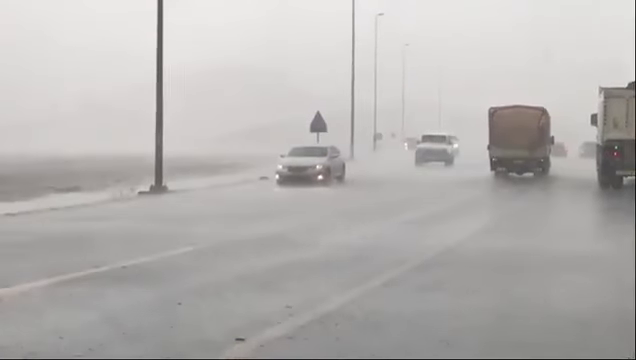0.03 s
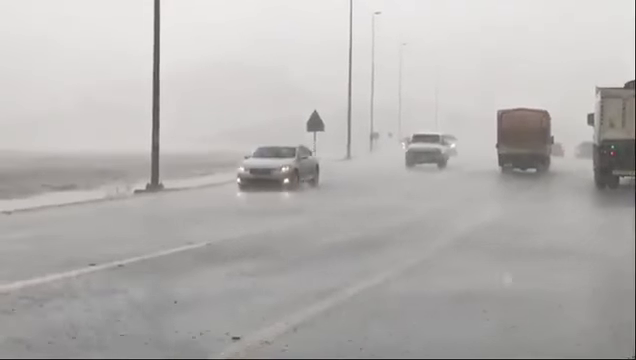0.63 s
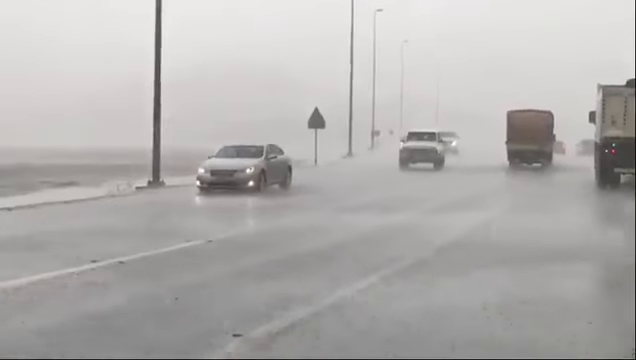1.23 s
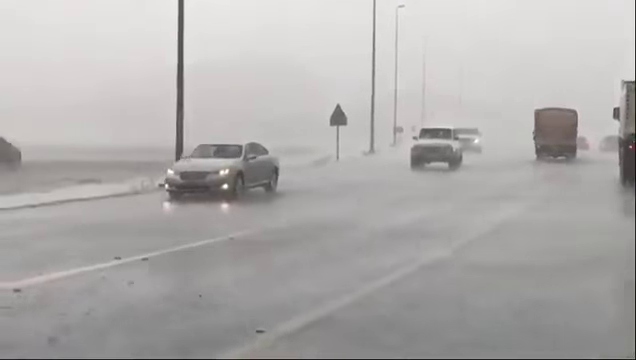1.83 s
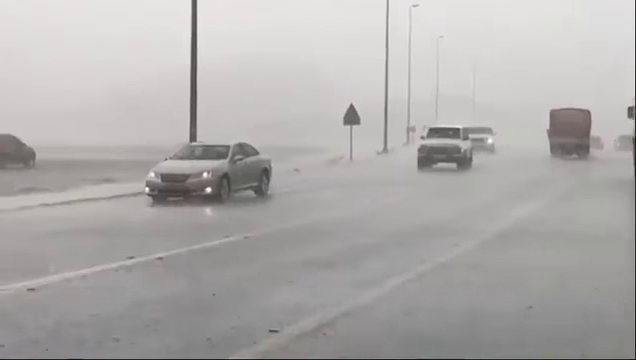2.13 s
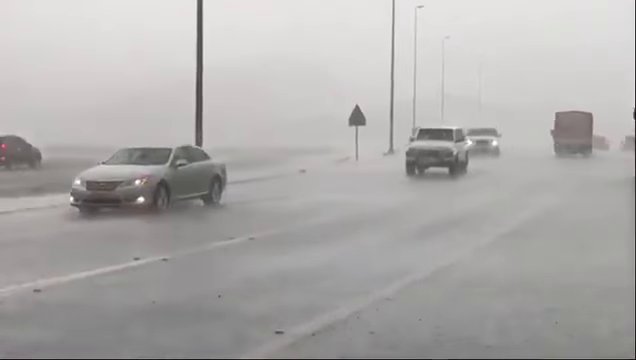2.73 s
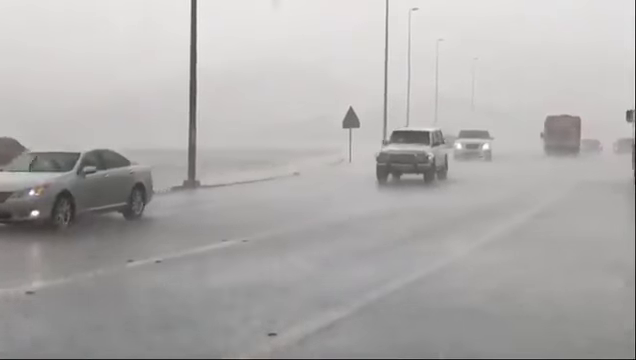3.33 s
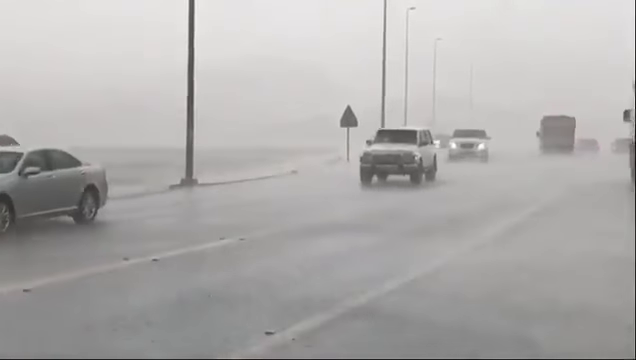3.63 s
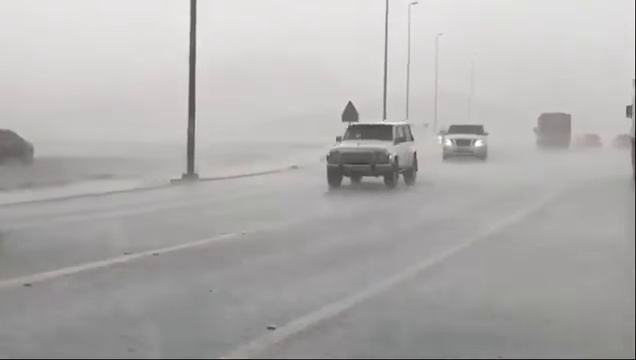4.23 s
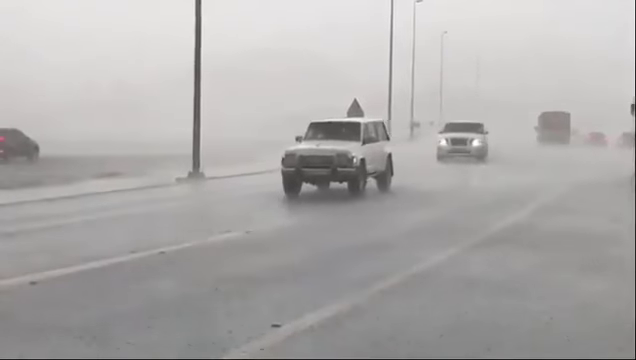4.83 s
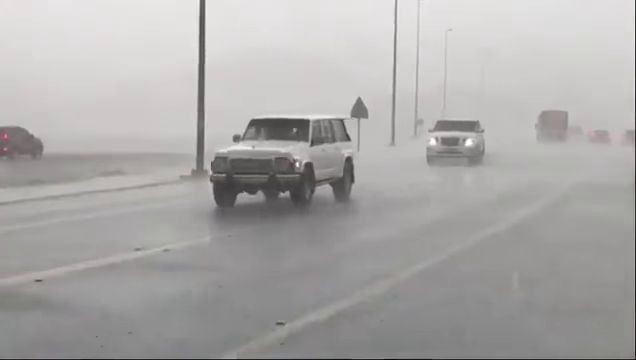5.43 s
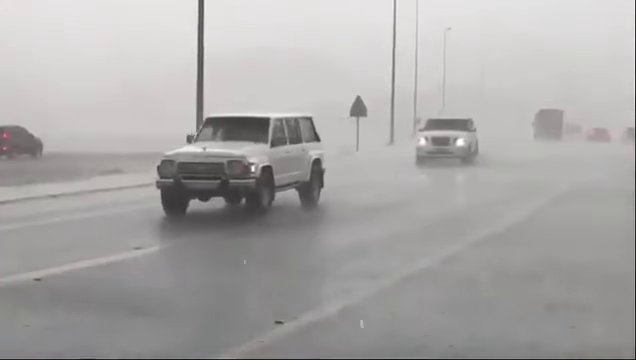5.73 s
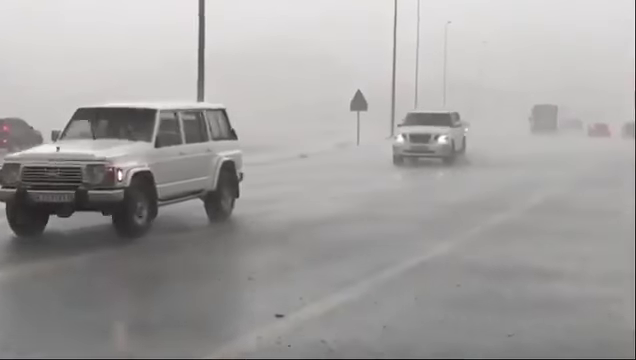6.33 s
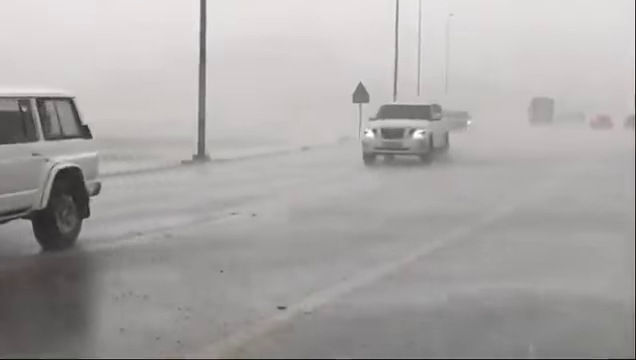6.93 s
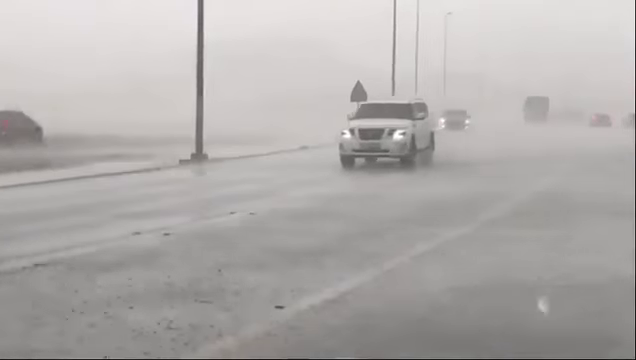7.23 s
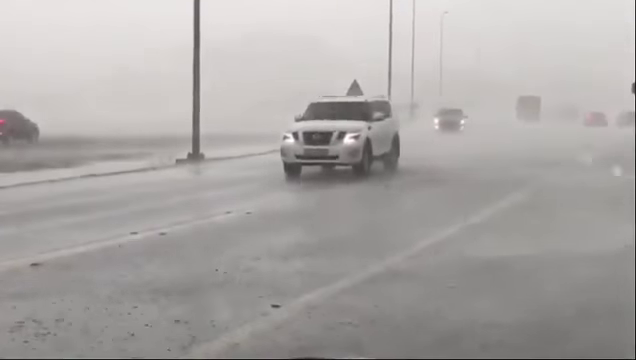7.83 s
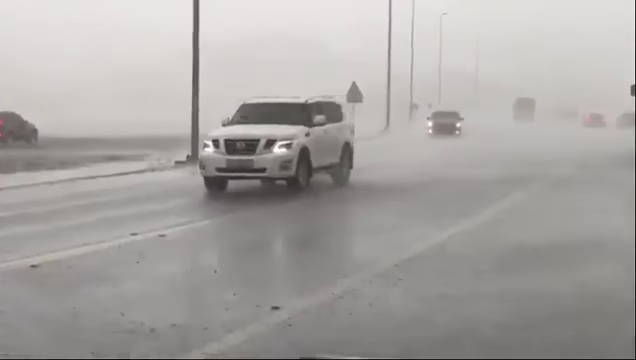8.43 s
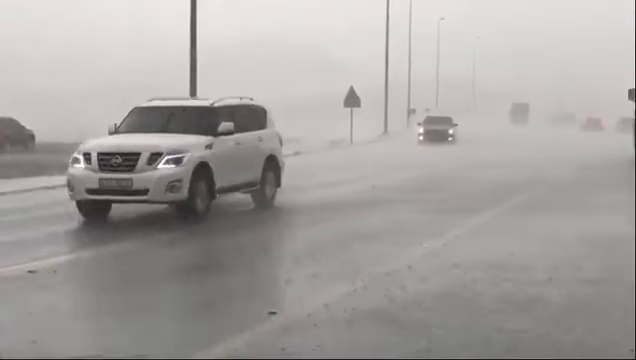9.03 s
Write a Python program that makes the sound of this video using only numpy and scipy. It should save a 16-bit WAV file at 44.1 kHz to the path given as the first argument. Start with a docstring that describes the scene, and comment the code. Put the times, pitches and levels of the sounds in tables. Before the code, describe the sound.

Heavy rain washes and patters on a flooded highway for the whole nine seconds, with water sloshing on the road and a faint rumble of distant traffic. Fat drops tick sharply close to the microphone at irregular moments, and gobs of water splash, mostly in the first five seconds. The rain swells briefly around 1, 2, 3 and 5 seconds. Two dull taps knock the microphone at about 0.4 and 3.6 seconds, and short, low wind puffs come and go, clearest near 2.5. Faint bubbles plink near 4.2 and 7.8 seconds. A car rolls slowly past at about 5.4 seconds, its tyres roaring and hissing with spray. A second, louder car builds behind it and peaks around 8 seconds. Its low engine hum comes in at about 6 seconds and rises slightly in pitch to the end.

```python
"""Downpour on a flooded highway

Heavy rain washes and patters. Fat drops tick on a surface close by, gobs of water splash and bubbles plink.
Two cars roll past slowly, tyres roaring and throwing up spray; the last one's engine hums and gains a
little speed. Now and then wind buffets the microphone, and two dull taps knock the phone's body."""
import sys
import numpy as np
from scipy import signal
from scipy.fft import rfft, irfft, next_fast_len
from scipy.io import wavfile
from scipy.ndimage import uniform_filter1d, map_coordinates

SR = 44100
rng = np.random.default_rng(int(sys.argv[2]) if len(sys.argv) > 2 else 0)


def persist_wave(psi):
    """Save psi, clipped to +-1, as 16-bit WAV."""
    counts = np.round(np.clip(psi, -1, 1) * 32767).astype(np.int16)
    wavfile.write(sys.argv[1], SR, np.atleast_2d(counts).T)


N = 399987

# Event levels are relative: each layer adds its own trim.
# the fattest close drops: time_s, level_db, pitch_hz, crack_db (against the tick)
CLOSE_DROPS = [(0.304, -10, 3700, -3), (0.7408, 0, 4160, -13), (0.816, -17, 3040, 4),
               (1.4682, -4, 2880, -22), (1.494, -12, 5300, -14), (1.5703, -10.5, 3870, -20),
               (1.645, -12, 4300, -17), (2.0134, -9, 3900, -20), (2.0506, -4, 4000, -22),
               (2.684, -9.5, 3600, 7), (3.101, -13.5, 4430, -14), (3.127, -7.5, 4270, -22),
               (3.1915, -5.5, 3140, -15), (3.4134, -5.5, 3720, -15), (4.2346, -8.5, 3640, -20),
               (4.783, 2.5, 5730, -9), (4.9601, -6.5, 3900, -18), (5.1964, -10, 3130, -5),
               (5.258, -9.5, 3990, 2), (5.9274, -10, 2420, -22), (6.8153, -7, 3500, -18),
               (7.0901, -3.5, 6900, -18), (7.111, -6.5, 3170, -18), (7.134, -5, 3360, -22),
               (7.2671, -5, 2840, -4), (7.4345, -4.5, 4040, -22), (8.1583, -4.5, 2939, -8)]
# the biggest splashes: start_s, level_db, pitch_hz, t60_s
BIG_SPLASHES = [(.13, -13.5, 1450, 0.25), (.276, -12.5, 3300, .17), (.728, -13, 4200, 0.069),
                (.742, -18.5, 1000, 0.36), (1.157, -10.5, 3950, 0.11), (1.66, -12.5, 1300, 0.12),
                (1.904, -3.5, 2200, 0.086), (2.185, -7, 3380, 0.078), (2.683, -7.5, 3160, 0.21),
                (3.192, -11, 3100, 0.11), (3.554, -16.5, 650, .15), (3.759, -12.5, 1100, 0.16),
                (4.03, -15.5, 900, 0.16), (4.481, -17, 1390, 0.37), (4.783, -13, 1500, 0.066),
                (4.856, -8, 4500, 0.043), (5.924, -3, 3550, 0.043), (7.639, -12.5, 900, 0.25),
                (8.157, -14, 2600, 0.16)]
# sheets of heavier rain: centre_s, level_db, half_width_s
RAIN_SHEETS = [(0.83, -1, 0.068), (2.05, 0, 0.25), (3.15, -1.5, 0.094), (3.88, -3, 0.078), (4.45, -8, 0.22),
               (5.2, -1, 0.11)]
# bubbles in a puddle: start_s, level_db, pitch_hz
PUDDLE_PLINKS = [(4.176, -17.5, 1770), (7.75, -19, 1710)]
# cars rolling past: nearest_s, tyres_db, rumble_db, distance_m
CAR_PASSES = [(5.35, -5.5, -36, 3.65), (8.0, 0, -41.5, 8.5)]
# the last car's engine: time_s, firing_hz, boom_db, overtones_db
ENGINE_CURVES = [(5.6, 45.33, -56, -58), (6.4, 45.93, -35.5, -46), (7.1, 48.47, -31.5, -46),
                 (7.3, 48.6, -42, -43.5), (8.1, 50.95, -40, -36.5), (9.07, 51.66, -41, -39.5)]
# exhaust overtones: firing_multiple, level_db
EXHAUST_OVERTONES = [(2, 1), (3, 0.5), (4, -2), (6, -4.5), (7, -8.5), (11, -14)]
# wind puffs on the microphone: centre_s, level_db, half_width_s
WIND_PUFFS = [(0.08, -32.5, 0.082), (.285, -28, 0.0059), (0.554, -30.5, 0.014), (1.426, -31, .023),
              (2.478, -22, 0.012), (2.518, -20, 0.014), (2.8, -35.5, 0.059), (7.169, -22.5, 0.0051),
              (7.457, -24, 0.0093), (8.39, -31, .05)]
# taps on the phone's body: start_s, level_db, pitch_hz
BODY_KNOCKS = [(0.37, -20.5, 314), (3.564, -22.5, 342)]

# EQ curves, all with the columns: frequency_hz, gain_db
WASH_EQ = [(90, -26), (160, 6.5), (220, -3.5), (480, -7.5), (700, -7), (1000, -7.5), (1400, -12),
           (4200, -7), (5500, -13), (7500, -9.5), (10400, -16.5)]  # far rain
PATTER_EQ = [(300, -12), (1000, -6.5), (2000, -5), (4200, 0.5), (5200, 1.5), (10400, -0.5)]  # small drops nearby
SLOSH_EQ = [(200, -15), (400, -4), (1000, 0.5), (1800, -5), (3500, -15), (9000, -37)]  # water running on the road
SPRAY_EQ = [(700, -27), (1600, -5), (2400, 0), (3300, -0.5), (4400, -2), (6500, -6), (10400, -14)]  # hiss of flying water
ROAR_EQ = [(90, -1), (160, -2), (280, 0.5), (430, -3), (560, -4), (750, -3.5), (1050, -0.5), (1600, -5.5),
           (3000, -32)]  # tyres on the road
RUMBLE_EQ = [(18, -25), (30, -22), (42, -2), (65, 0), (110, -3.5), (190, -8), (300, -13), (600, -25.5),
             (1500, -71)]  # the vehicles' low end
GROWL_EQ = [(110, -25), (160, 6), (220, -17), (350, -1), (450, -7), (550, 2.5), (620, 0), (760, -29)]  # the engine's body
BUFFET_EQ = [(18, -23), (40, -10), (75, 4), (130, -5), (250, -12.5), (500, -19.5), (1500, -52), (4000, -85)]  # wind on the microphone
MIC_PORT_EQ = [(3300, 0), (3650, -1), (4200, 0), (4850, -2.5), (5300, -0.5), (7000, 0.5), (7600, -2),
               (8600, 1)]  # the microphone port

TOP_HZ = 10500  # band limit


def rain():
    """Far drops merge into a wash; nearer ones patter in flurries, tap the surface and ring bubbles."""
    wash = amp(-36 + 0.24 * wobble(7)) * rush(WASH_EQ, patchy_db=5)
    fine = grains(count=14000, pitch_hz=3430, spread=0.762, cycles=2.6, accent_db=6.5, size=150)
    clicks = grains(count=400, pitch_hz=4520, spread=0.37, cycles=0.8, accent_db=6, size=100)
    pings = unit(grains(count=90, pitch_hz=4030, spread=0.11, cycles=2.6, accent_db=1, size=400))
    bubbles = grains(count=2500, pitch_hz=3570, spread=0.5, cycles=16, accent_db=0.5, size=700)
    fine, clicks, bubbles = (coloured(layer, PATTER_EQ) for layer in (fine, clicks, bubbles))
    # a flurry lifts the patter and stirs the water on the road
    flurry_db = 3.4 * wobble(18) + 1.5 * wobble(70)
    patter = unit(fine * amp(flurry_db))
    slosh = unit(amp(3 * wobble(14) + 0.8 * flurry_db) * rush(SLOSH_EQ, patchy_db=2.5))
    near = amp(-36.5) * patter + amp(-41.5) * clicks + amp(-45.5) * (pings + bubbles)
    return wash + near + amp(-45) * slosh


def drops():
    """Each close drop flattens in a millisecond, rings the surface and collapses in a weaker splat."""
    out, t = np.zeros(N), np.arange(SR // 25) / SR - 0.003
    impact = np.exp(-((t - 0.0014) / 0.00073) ** 2)
    splat = np.exp(-np.abs(t - 0.003) / 0.0037)
    for time_s, level_db, pitch_hz, crack_db in CLOSE_DROPS:
        noise = rng.standard_normal((2, len(t)))
        surface = [(pitch_hz, 3.5, 1), (4180, 6.8, 0.65), (950, 0.94, -0.33)]
        tick = resonate(noise[0] * (impact + amp(-8) * splat), surface)
        crack = resonate(noise[1] * impact, [(6600, 1.6, 1)])
        hit = tick / np.abs(tick).max() + amp(crack_db) * crack / np.abs(crack).max()
        add(out, time_s + t[0], amp(level_db - 1) * hit)
    return out


def splashes():
    """A gob of water bursts into a dying shower of droplets, with its own pitch over a dull slap."""
    out, t = np.zeros(N), np.arange(SR // 3) / SR
    attack = 1 - np.exp(-t / 0.00091)
    for start_s, level_db, pitch_hz, t60_s in BIG_SPLASHES:
        droplets = rng.standard_normal(len(t)) * amp(3.8 * rng.standard_normal(len(t)))
        shower = unit(resonate(droplets, [(pitch_hz, 1.7, 1), (1200, 0.59, 0.61)]))
        add(out, start_s, amp(level_db - 11.5 - 60 * t / t60_s) * attack * shower)
    return out


def sheets():
    """A sheet of heavier rain hisses and stirs the water on the road."""
    hiss = amp(-36) * rush(SPRAY_EQ, patchy_db=3)
    slosh = amp(-37.5) * rush(SLOSH_EQ, patchy_db=3.5)
    return swells(RAIN_SHEETS) * (hiss + slosh)


def plinks(t60_s=0.078, rise_per_s=1.0):
    """A trapped bubble rings briefly and unsteadily, rising in pitch."""
    out, t = np.zeros(N), np.arange(SR // 8) / SR
    attack = 1 - np.exp(-t / 0.0012)
    for start_s, level_db, pitch_hz in PUDDLE_PLINKS:
        waver = 0.13 * np.cumsum(rng.standard_normal(len(t)))
        ring = np.sin(2 * np.pi * pitch_hz * (t + rise_per_s * t ** 2 / 2) + waver)
        add(out, start_s, amp(level_db - 60 * t / t60_s) * attack * ring)
    return out


def traffic(speed_m_per_s=6.02, far_roar_db=-47, far_rumble_db=-39.5):
    """Tyre roar, spray and rumble swell as each car comes near, over a bed of distant traffic."""
    t = np.arange(N) / SR
    tyres = bodies = 0
    for nearest_s, tyres_db, rumble_db, distance_m in CAR_PASSES:
        nearness = distance_m / np.hypot(distance_m, speed_m_per_s * (t - nearest_s))  # 1 / r gain
        tyres = np.hypot(tyres, amp(tyres_db) * nearness)  # the cars add in power
        bodies = np.hypot(bodies, amp(rumble_db) * nearness)
    roar = amp(0.8 * wobble(4.6)) * rush(ROAR_EQ, patchy_db=3)
    spray = amp(0.28 * wobble(17)) * rush(SPRAY_EQ, patchy_db=2.5)
    rumble = amp(1.45 * wobble(11)) * rush(RUMBLE_EQ, patchy_db=3)
    return (np.hypot(amp(-32) * tyres, amp(far_roar_db)) * roar
            + amp(-27.5) * tyres * spray
            + np.hypot(bodies, amp(far_rumble_db)) * rumble)


def engine():
    """The exhaust booms under wavering overtones, with a growl that pulses once per firing."""
    firing_hz, boom_db, overtones_db = curves(ENGINE_CURVES)
    phase = 2 * np.pi * np.cumsum(firing_hz * (1 + 0.008 * wobble(9))) / SR
    overtones = np.zeros(N)
    for multiple, level_db in EXHAUST_OVERTONES:
        gain = amp(level_db + 2.5 * wobble(5))
        drift = 2 * np.pi * rng.random() + 0.3 * wobble(14)
        overtones += gain * np.sin(multiple * phase + drift)
    exhaust = np.sqrt(2) * (amp(boom_db) * np.sin(phase) + amp(overtones_db - 2.5) * overtones)
    growl = coloured(rng.standard_normal(N) * (1 + np.cos(phase)), GROWL_EQ)
    return exhaust + amp(overtones_db + 0.9) * growl


def wind():
    """Short, low puffs of air buffet the microphone port."""
    return swells(WIND_PUFFS) * coloured(rng.standard_normal(N), BUFFET_EQ)


def knocks(decay_s=0.0021):
    """A tap on the phone's body gives a dull ring that dies at once."""
    out, t = np.zeros(N), np.arange(SR // 25) / SR
    for start_s, level_db, pitch_hz in BODY_KNOCKS:
        ring = np.sin(2 * np.pi * pitch_hz * t) * np.exp(-t / decay_s)
        add(out, start_s, amp(level_db + 5.5) * ring)
    return out


def grains(count, pitch_hz, spread, cycles, accent_db, size):
    """Randomly timed damped rings of scattered pitch and strength, size samples long."""
    start, softness, phase = rng.random((count, 3)).T[:, :, None]
    hz = np.clip(pitch_hz * np.exp(spread * rng.standard_normal((count, 1))), 400, 14000)
    age = np.arange(size)
    turns = hz * age / SR
    gain = amp(-accent_db * np.log(softness + 0.05))  # a few grains stand out
    decay = np.exp(-turns / cycles) * (1 - age / size)
    rings = gain * decay * np.sin(2 * np.pi * (turns + phase))
    return np.bincount(((start * N).astype(int) + age).ravel(), rings.ravel(), N)[:N]


def rush(eq, patchy_db):
    """Coloured noise at rms 1, mottled with random gain across time and frequency."""
    spectrum = signal.stft(rng.standard_normal(N), nperseg=1024)[2]
    patches = uniform_filter1d(rng.standard_normal(spectrum.shape), size=4, axis=0)
    patches = unit(uniform_filter1d(patches, size=4, axis=1))
    mottled = signal.istft(spectrum * amp(patchy_db * patches), nperseg=1024)[1]
    return coloured(mottled[:N], eq)


def swells(rows):
    """Gain envelope of bell-shaped swells."""
    t = np.arange(N) / SR
    return sum(amp(db) * np.exp(-((t - s) / half_width_s) ** 2 / 2) for s, db, half_width_s in rows)


def wobble(knots_per_s):
    """Smooth random modulation."""
    knots = rng.standard_normal(2000)
    return map_coordinates(knots, [np.arange(N) * knots_per_s / SR + 2], mode="wrap")


def curves(rows):
    """One automation curve for each column after the time."""
    time_s, *columns = np.transpose(rows)
    return [np.interp(np.arange(N) / SR, time_s, column) for column in columns]


def resonate(x, modes):
    """Band-limited x through parallel band-passes: centre_hz, q, gain."""
    def response(hz):
        bands = (gain * 1j * hz * centre / q / (centre ** 2 - hz ** 2 + 1j * hz * centre / q)
                 for centre, q, gain in modes)
        return sum(bands) * (hz < TOP_HZ)
    return filtered(x, response)


def coloured(x, eq):
    """Band-limited x through an EQ curve, at rms 1."""
    return unit(filtered(x, lambda hz: eq_gain(eq, hz) * (hz < TOP_HZ)))


def eq_gain(eq, hz):
    """Gain of an EQ curve, its points joined on a log frequency axis."""
    points_hz, gain_db = np.transpose(eq)
    return amp(np.interp(np.log(hz + 1), np.log(points_hz), gain_db))


def filtered(x, response):
    """x through a frequency response."""
    size = next_fast_len(len(x) + 8192)
    return irfft(rfft(x, size) * response(np.fft.rfftfreq(size, 1 / SR)), size)[:len(x)]


def add(track, start_s, sound):
    """Mix a sound into the track."""
    part = track[max(round(start_s * SR), 0):][:len(sound)]
    part += sound[:len(part)]


def amp(db):
    """Decibels to gain."""
    return 10 ** (np.asarray(db) / 20)


def unit(x):
    """Scale to rms 1."""
    return x / np.sqrt(np.mean(x ** 2) + 1e-20)


def scene():
    """Water, traffic, wind and taps in one mono mix."""
    water = rain() + sheets() + drops() + splashes() + plinks()
    return (water + traffic() + engine() + wind() + knocks())[None]


def record(dry, ceiling=0.8):
    """The phone's port colours the mix, the hardest peaks are rounded and a steep low-pass follows."""
    heard = filtered(dry[0], lambda hz: eq_gain(MIC_PORT_EQ, hz))
    rounded = heard / (1 + np.abs(heard / ceiling) ** 6) ** (1 / 6)
    return filtered(rounded, lambda hz: 1 / np.sqrt(1 + (hz / TOP_HZ) ** 120))[None]


dry = scene()
out = record(dry)
persist_wave(out)
```